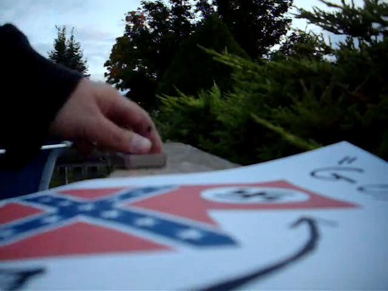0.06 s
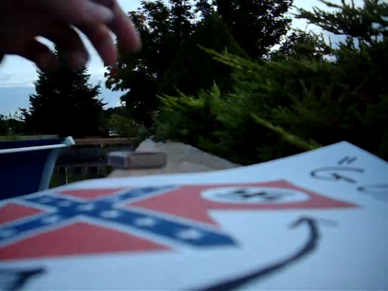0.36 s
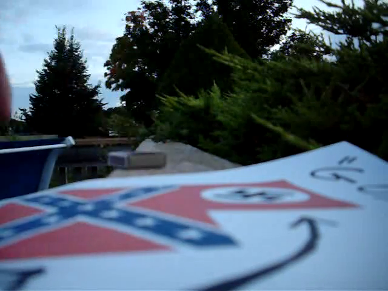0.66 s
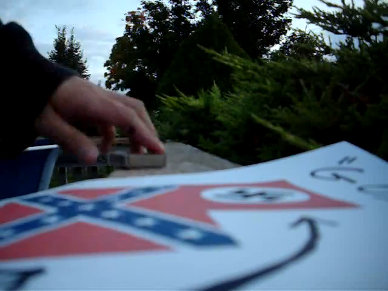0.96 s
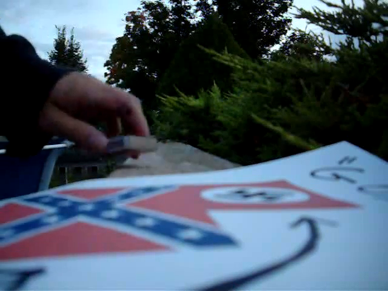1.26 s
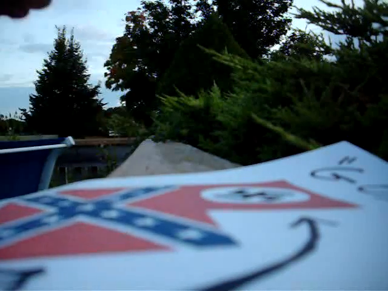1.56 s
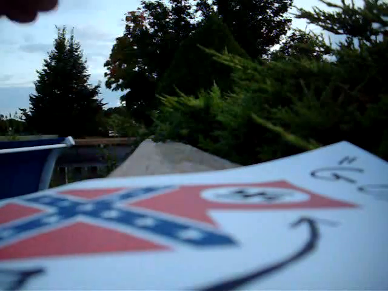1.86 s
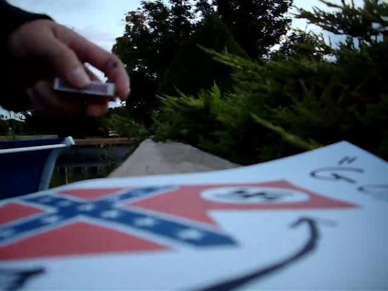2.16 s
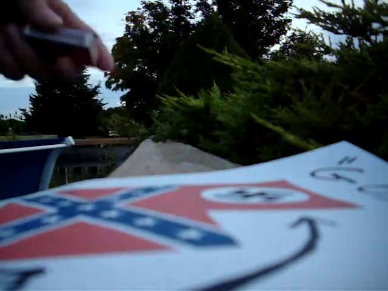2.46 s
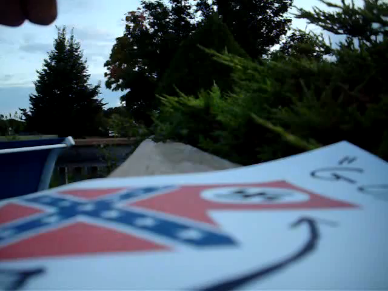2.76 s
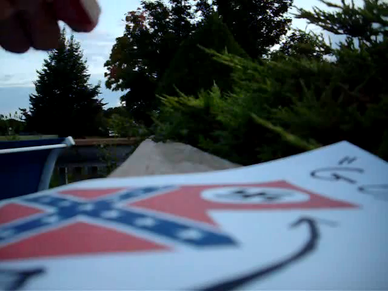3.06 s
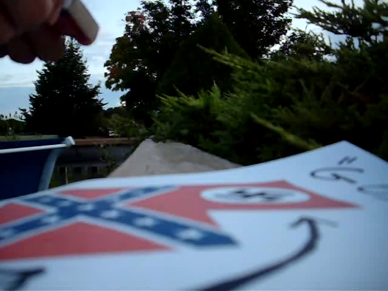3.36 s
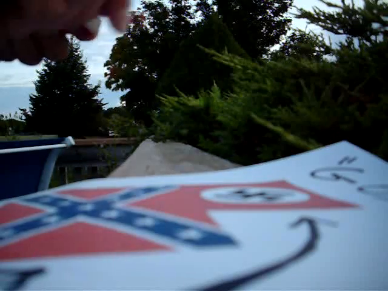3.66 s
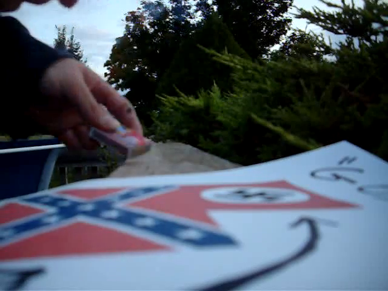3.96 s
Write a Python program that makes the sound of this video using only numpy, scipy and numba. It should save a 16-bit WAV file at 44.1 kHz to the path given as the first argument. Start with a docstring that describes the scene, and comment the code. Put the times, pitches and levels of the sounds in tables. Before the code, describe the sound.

A small cardboard box scrapes, clicks and snaps in the hand in a quiet garden.

```python
"""A small card box is slid onto a garden slab, picked up, turned in the fingers and snapped.
Its friction is a dense train of tiny slips; its bumps and clicks excite damped modes. Behind it
lie far traffic, wind rumble, machinery hum, faint hoots and a small bird's gliding whistles.
An automatic gain control ducks at each loud click and creeps back; the sound ends near 6 kHz."""
import sys
import numpy as np
from scipy import signal
from scipy.fft import rfft, irfft
from scipy.io import wavfile
from scipy.ndimage import uniform_filter1d
from numba import njit

SR = 44100
rng = np.random.default_rng(int(sys.argv[2]) if len(sys.argv) > 2 else 0)


def unload_audio(sound):
    """Save the sound as a 16-bit wav file, at the path given as the first command line argument."""
    columns = np.transpose(np.atleast_2d(sound))
    # keep every value between -1 and 1, then stretch to whole-number steps
    steps = np.round(np.clip(columns, -1, 1) * 32767)
    wavfile.write(sys.argv[1], SR, steps.astype(np.int16))


N = 176400

# wall modes of the box (frequency [Hz], level [dB], T60 [s])
WALL_MODES = [(1892.3, -5.5, 0.017), (2081.2, -1, 0.024), (2643, -11.5, 0.017), (3111.7, -12, 0.012),
              (3489.6, -11, .012), (4459.1, -7.5, .016), (4711.8, -9.5, 0.016), (5196, -9, 0.0096),
              (5732, -17.5, .01)]


def amp(db):
    """Amplitude ratio of a level in decibels."""
    return 10 ** (np.asarray(db) / 20)


def unit(x):
    """Normalisation to an rms of 1."""
    return x / np.sqrt(np.mean(x ** 2))


def clock():
    """Sample times in seconds."""
    return np.arange(N) / SR


def colour(x, spectrum):
    """Zero-phase filtering by a curve of (frequency [Hz], gain [dB])."""
    hz, db = np.array(spectrum).T
    bin_hz = np.maximum(np.arange(N + 1) * SR / (2 * N), 1)
    gain = amp(np.interp(np.log(bin_hz), np.log(hz), db))
    return irfft(rfft(x, 2 * N) * gain)[:N]


def noise(spectrum):
    """Spectrally shaped Gaussian noise of rms 1."""
    return unit(colour(rng.standard_normal(N), spectrum))


def drift(rate_hz):
    """Random modulation: smoothed steps of rms 1."""
    hold = int(SR / rate_hz)
    steps = np.repeat(rng.standard_normal(512), hold)[:N]
    return unit(uniform_filter1d(uniform_filter1d(steps, hold), hold))


def fade(t, t60):
    """Exponential decay, 60 dB in t60 seconds."""
    return np.exp(-np.log(1000) * t / t60)


def add(out, start, x):
    """Superposition of x from a start time in seconds."""
    i = max(int(start * SR), 0)
    out[i:i + len(x)] += x[:max(N - i, 0)]


def ringing(modes):
    """Impulse response as a sum of damped modes."""
    t = clock()[:SR // 10]
    return sum(amp(db) * fade(t, t60) * np.cos(2 * np.pi * hz * t) for hz, db, t60 in modes)


def stick_slip(slips_per_s=3200, spread_db=4.5):
    """Stick-slip friction as a Poisson train of uneven impulses."""
    slipping = rng.random(N) < slips_per_s / SR
    return slipping * rng.choice([-1, 1], N) * amp(spread_db * np.minimum(rng.exponential(size=N), 2))


def envelope(strokes):
    """Strokes swell and decay exponentially and add in power."""
    t = clock()
    return np.sqrt(sum(amp(db - 20 * np.maximum((peak - t) / rise, (t - peak) / fall)) ** 2
                       for peak, db, rise, fall in strokes))


def sliding():
    """Sliding friction: the box grates on the slab in tiny slips."""
    # (peak time [s], level [dB], 20 dB rise [s], 20 dB fall [s])
    slides = [(.003, -22, .02, 0.07), (.139, -20, 0.05, 0.0828), (1.079, -36, .01, 0.0761),
              (1.106, -21, .016, 0.0789), (1.157, -21.5, 0.045, 0.042)]
    # card on slab (frequency [Hz], level [dB])
    grating_spectrum = [(200, -9.5), (730, 3), (1130, -0.5), (1600, -3), (2300, -3), (2850, -1),
                        (3250, -5.5), (4000, 3), (4300, -2.5), (4700, -1), (5400, -7.5), (9000, -12),
                        (16000, -24)]
    return unit(colour(stick_slip(), grating_spectrum)) * envelope(slides)


def outdoors():
    """Random modulation makes far tyre noise swell, wind rumble gust and machinery hum waver."""
    # tyre noise (frequency [Hz], level [dB])
    traffic_spectrum = [(150, -6.5), (250, -2.5), (420, -5.5), (600, -1), (800, .5), (1000, -0.5),
                        (1250, -5.5), (1600, -12.5), (2200, -18), (3200, -23.5), (4500, -27), (6500, -34)]
    # wind rumble (frequency [Hz], level [dB])
    wind_spectrum = [(15, -13), (30, -4.5), (45, -3), (65, 0), (85, -1.5), (120, -4), (180, -6.5),
                     (260, -15.5), (500, -30), (3000, -63.5)]
    # slow trends (time [s], traffic level [dB], wind level [dB])
    trends = [(0, -33.5, -33), (.3, -29.5, -28.5), (.6, -29.5, -29.5), (.9, -29, -29.5), (1.35, -31.5, -31),
              (1.65, -31, -28.5), (1.9, -30.5, -30), (2.2, -31, -28), (2.7, -31.5, -29), (3.0, -30, -29),
              (3.35, -31, -31.5), (3.6, -30.5, -31), (4, -36, -35.5)]
    # far machinery (frequency [Hz], level [dB])
    hum_partials = [(59.3, -33.5), (94.5, -37.5), (322, -47.5)]
    t, hum = clock(), np.zeros(N)
    times, traffic_db, wind_db = np.array(trends).T
    traffic = noise(traffic_spectrum) * amp(np.interp(t, times, traffic_db) + .5 * drift(14))
    wind = noise(wind_spectrum) * amp(np.interp(t, times, wind_db) + .98 * drift(12))
    for hz, db in hum_partials:
        flutter_db = 2.8 * drift(5)
        wavering_hz = hz * (1 + .012 * drift(12))
        hum += amp(db + flutter_db) * np.sin(2 * np.pi * np.cumsum(wavering_hz) / SR)
    return traffic + wind + hum


def bumps(rise_s=.002):
    """Impacts on the slab excite the hollow modes of the box."""
    # (time [s], level [dB])
    impacts = [(.0025, -9), (.1335, -15), (.1455, -12)]
    # (frequency [Hz], level [dB], T60 [s])
    hollow_modes = [(500, -3, .018), (760, 0, .02)]
    out, t = np.zeros(N), clock()[:SR // 10]
    for start, db in impacts:
        add(out, start, amp(db) * ringing(hollow_modes) * (1 - fade(t, rise_s)))
    return out


def clicks(crack_db=-10.5, crack_t60_s=.00853):
    """Impulsive excitation: a broadband crack, ringing walls and a short knock of the edges."""
    # (time [s], level [dB], relative ring level [dB], relative knock level [dB])
    impulses = [(.1376, 2, 4, -15), (.1386, 3, 3, -14), (.143, 6.5, -2, -24), (1.1062, -4.5, -8.5, -19.5),
                (1.151, -7.5, -5.5, -24), (1.1613, -1, -9.5, -24.5), (1.5655, -12, 5, -20),
                (1.569, -13, 0, -22), (1.7488, -1, -3, -20), (2.7795, 2, -1, -24), (2.7812, 0, -1, -24),
                (2.784, -2, 3, -18), (3.6869, 20, -10, 1), (3.6893, 9, 0, -6), (3.6915, 7.5, -4.5, -12),
                (3.6961, 3, -3, -19), (3.7, 3, -2.5, -6.5), (3.744, -1, -9, -23.5)]
    # stiff edges (frequency [Hz], level [dB], T60 [s])
    edge_modes = [(988.5, 0, .0045), (2391, -4, 0.0028)]
    # (frequency [Hz], level [dB])
    crack_spectrum = [(300, -19.5), (1200, -11.5), (2500, -5.5), (4000, 0), (5000, -1.5), (7000, -4),
                      (14000, -9.5)]
    out, bursts, t = np.zeros(N), np.zeros(N), clock()[:SR // 10]
    ring, knock = amp(-16) * ringing(WALL_MODES), ringing(edge_modes)
    for start, db, ring_db, knock_db in impulses:
        add(out, start, amp(db) * (amp(ring_db) * ring + amp(knock_db) * knock))
        add(bursts, start, amp(db + crack_db) * fade(t, crack_t60_s))
    return out + bursts * noise(crack_spectrum)


def hoots():
    """Far, low pure tones glide linearly in frequency under a half-sine envelope."""
    # (start [s], duration [s], level [dB], frequency [Hz], glide [Hz/s])
    tones = [(.25, .8, -35.5, 326, -10), (2.52, .26, -31, 317, 69)]
    out = np.zeros(N)
    for start, length, db, hz, glide in tones:
        t = clock()[:int(length * SR)]
        phase = 2 * np.pi * (hz + .5 * glide * t) * t
        add(out, start, amp(db) * np.sin(np.pi * t / length) * np.sin(phase))
    return out


def bird(warble_depth=.012, rasp_db=2.5, reverb_t60_s=.3, reverb_db=-7.5):
    """Frequency-modulated, slightly raspy whistles reverberate by scattering from the trees."""
    # rising, falling and arched notes (time [s], level [dB], pitch [Hz])
    rising_notes = [(.482, -46, 3100), (3.606, -44, 3700)]
    falling_notes = [(.564, -42, 4000), (.944, -37, 3980), (1.577, -37, 4093), (2.012, -40, 4020),
                     (2.497, -42.5, 4080), (3.194, -41, 2950), (3.475, -45, 3600), (3.64, -47.5, 3800)]
    arched_notes = [(2.029, -33.5, 4270), (3.221, -37.5, 4350)]
    # their contours (time from onset [s], pitch ratio [1], level [dB])
    rise = [(0, .86, -8), (.012, .93, 0), (.032, 1, -6)]
    fall = [(0, 1.01, -15), (.008, .985, -1), (0.021, .93, 0.5), (.036, .86, -15)]
    arch = [(0, .58, -7), (.012, .76, -8), (.025, .95, -3), (.034, 1, 0), (.041, 0.99, 0.5),
            (.048, .94, -0.5), (.059, .925, -3), (.07, .93, -16)]
    direct, t = np.zeros(N), clock()
    for notes, contour in ((rising_notes, rise), (falling_notes, fall), (arched_notes, arch)):
        times, ratio, contour_db = np.array(contour).T
        age = t[:int(times[-1] * SR)]
        for start, db, hz in notes:
            warble = 1 + warble_depth * drift(260)[:len(age)]
            phase = 2 * np.pi * np.cumsum(hz * np.interp(age, times, ratio) * warble) / SR
            level_db = db + np.interp(age, times, contour_db) + rasp_db * drift(600)[:len(age)]
            add(direct, start, amp(level_db) * np.sin(phase))
    echoes = rng.standard_normal(SR) * fade(t[:SR], reverb_t60_s)
    return direct + amp(reverb_db) * signal.fftconvolve(direct, echoes / np.linalg.norm(echoes))[:N]


def rubbing(ring_db=-1):
    """Forced vibration: the friction of the fingers rustles and drives the wall modes."""
    # (peak time [s], level [dB], 20 dB rise [s], 20 dB fall [s])
    rubs = [(1.4, -37, 0.0774, 0.0298), (1.541, -35, .025, 0.0735), (1.568, -24, .005, 0.009),
            (2.78, -16.5, 0.01, 0.0164), (2.802, -35, 0.00899, 0.0679), (3.062, -41.5, 0.0304, 0.1742),
            (3.3, -29, 0.018, 0.0007), (3.72, -22, .03, 0.0593), (3.908, -31.5, 0.038, 0.1121),
            (3.985, -26.5, 0.03008, 0.9845)]
    # skin on card (frequency [Hz], level [dB])
    skin_spectrum = [(300, -12), (1200, -3), (2000, 1), (3500, -4), (5000, -7), (9000, -15.5), (16000, -25)]
    slips = stick_slip()
    rustle = unit(colour(slips, skin_spectrum))
    walls = unit(signal.fftconvolve(slips, ringing(WALL_MODES))[:N])
    return unit(rustle + amp(ring_db) * walls) * envelope(rubs)


def nail_ticks(t60_s=.010):
    """Brief contacts of fingernails on the edges radiate bright, fast-decaying noise."""
    # (time [s], level [dB])
    ticks = [(1.643, -34), (1.6995, -22.5), (1.7328, -31), (1.7402, -20), (1.7587, -32), (1.7683, -29),
             (2.7808, -10), (2.7965, -26), (3.097, -33)]
    # (frequency [Hz], level [dB])
    nail_spectrum = [(1500, -22), (3000, -11), (4600, 0), (7000, -6), (12000, -24)]
    bursts, t = np.zeros(N), clock()[:SR // 10]
    for start, db in ticks:
        add(bursts, start, amp(db) * fade(t, t60_s))
    return bursts * noise(nail_spectrum)


def scene():
    """Box, garden and bird superpose at one microphone."""
    return (sliding() + outdoors() + bumps() + clicks() + hoots() + bird() + rubbing() + nail_ticks())[None]


@njit
def gain_reduction(excess_db, attack_s, recovery_s):
    """A first-order envelope follower with separate rising and falling time constants."""
    out, cut_db = np.empty(len(excess_db)), 0.
    for i in range(len(excess_db)):
        lag_s = attack_s if excess_db[i] > cut_db else recovery_s
        cut_db += (excess_db[i] - cut_db) / (lag_s * SR)
        out[i] = cut_db
    return out


def record(dry, threshold_db=-13, saturation=.65, thump_per_db=.0024, thump_s=.045):
    """Compression ducks with a soft thump, peaks saturate, the preamp whines and hisses, treble is cut."""
    # preamp noise (frequency [Hz], level [dB])
    hiss_spectrum = [(100, -1.5), (900, 1.5), (2000, 1), (4500, -1), (6500, -4.5)]
    # treble loss (frequency [Hz], gain [dB])
    roll_off = [(4700, 0), (5500, -3.5), (6000, -8.5), (6500, -17), (7000, -34.5)]
    whine = amp(-56.5) * np.sin(2 * np.pi * 3673.6 * clock())
    x = dry[0] + whine
    excess_db = np.maximum(20 * np.log10(np.abs(x) + 1e-9) - threshold_db, 0)
    cut_db = gain_reduction(excess_db, attack_s=.00033, recovery_s=.48206)
    duck_steps_db = np.maximum(np.diff(cut_db, prepend=0), 0)
    thump = thump_per_db * signal.lfilter([1], [1, -np.exp(-1 / (thump_s * SR))], duck_steps_db)
    limited = saturation * np.tanh(x * amp(-cut_db) / saturation)
    hiss = amp(-51) * noise(hiss_spectrum)
    low_pass = signal.ellip(10, .1, 80, 7050, fs=SR, output="sos")
    return signal.sosfilt(low_pass, colour(limited + thump + hiss, roll_off))[None]


dry = scene()
out = record(dry)
unload_audio(out)
```